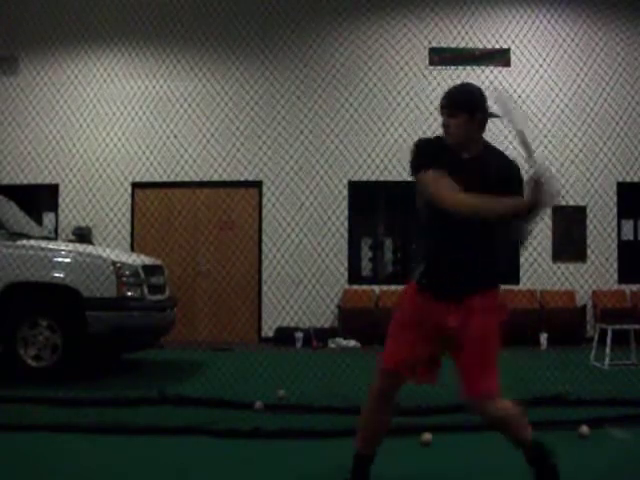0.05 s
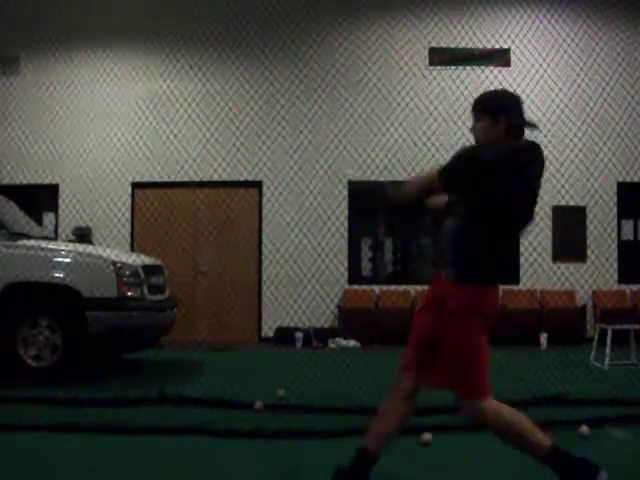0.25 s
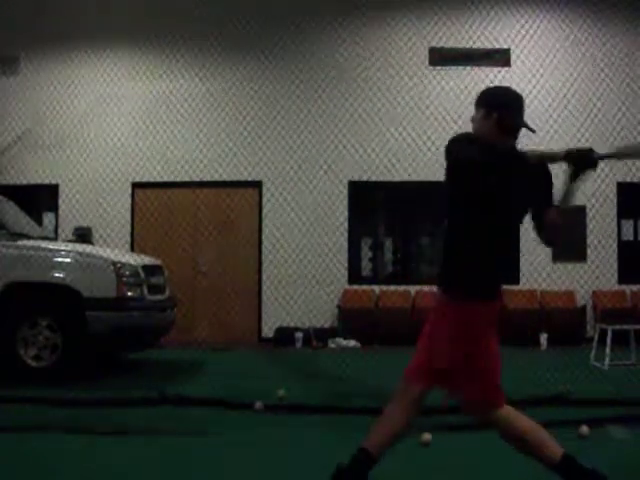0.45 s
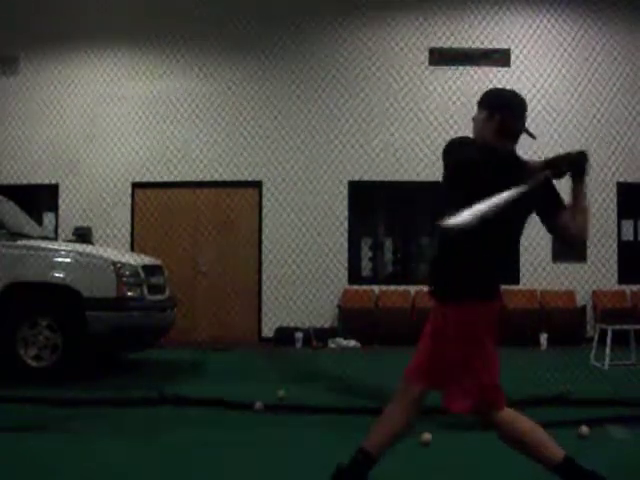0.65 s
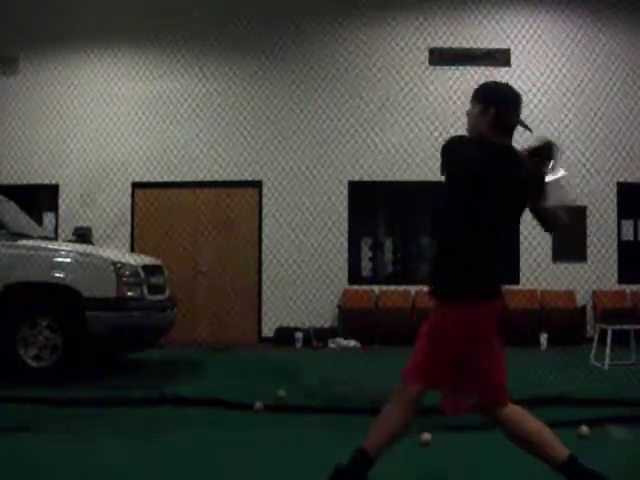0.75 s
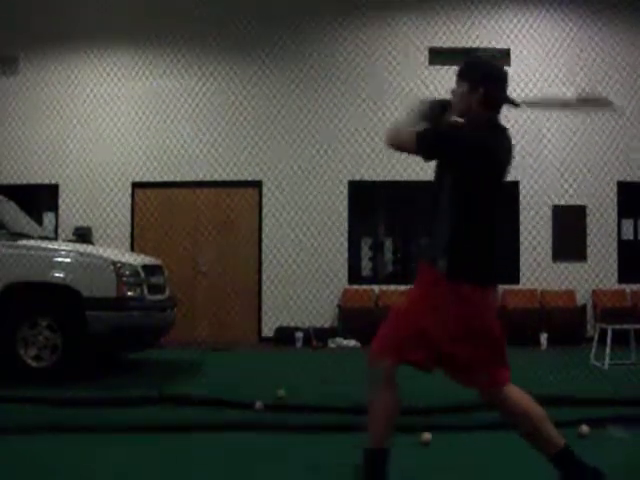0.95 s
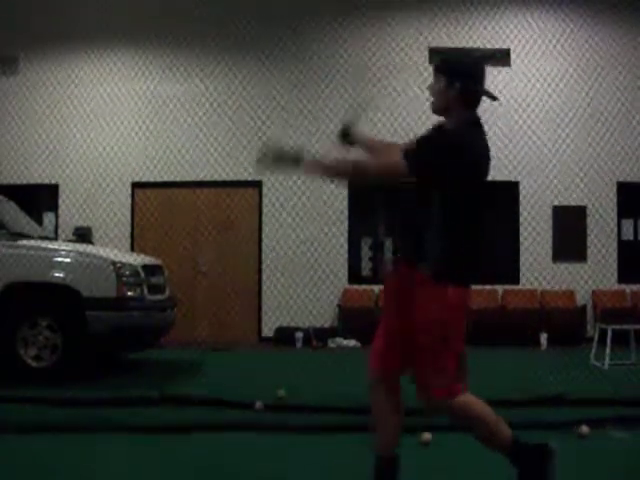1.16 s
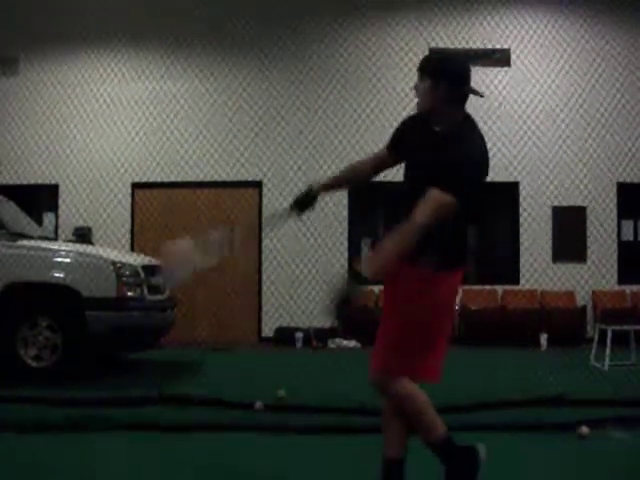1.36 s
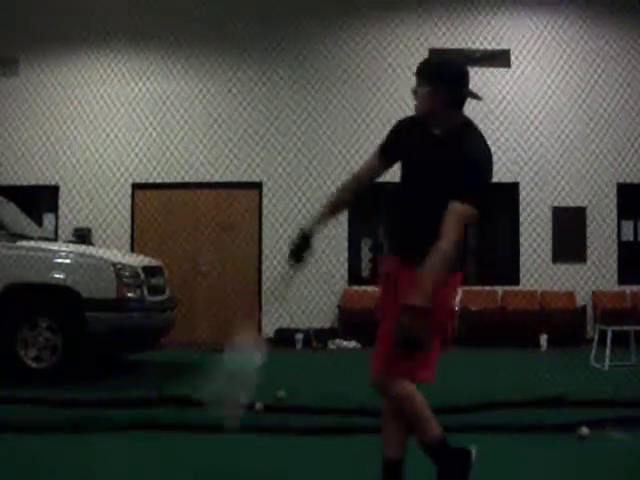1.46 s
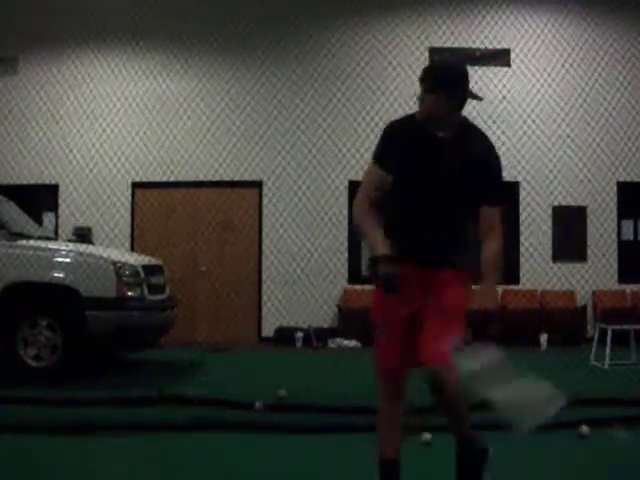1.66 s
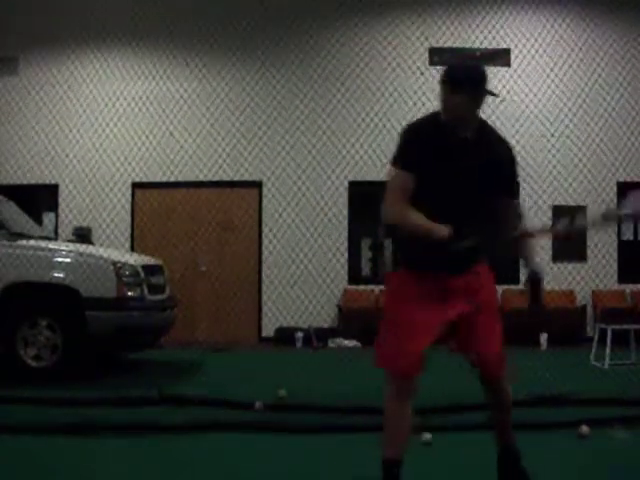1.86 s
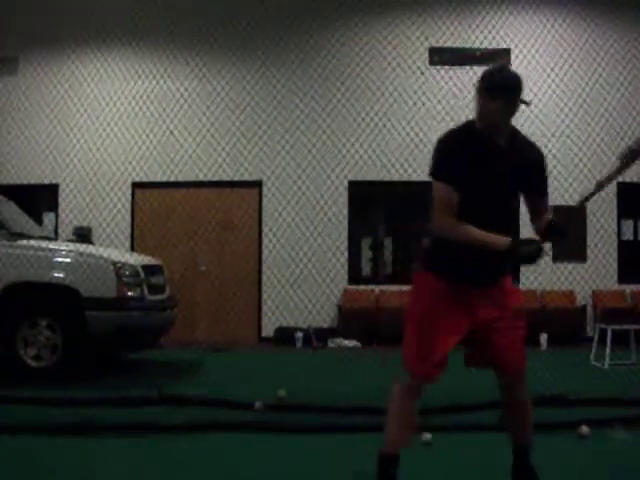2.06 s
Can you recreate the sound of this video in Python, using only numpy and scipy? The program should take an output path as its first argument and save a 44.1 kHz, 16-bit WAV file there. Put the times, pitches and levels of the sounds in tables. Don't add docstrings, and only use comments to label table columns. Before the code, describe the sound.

Loud bat-on-ball crack and bright metallic ring, echoing in a large hard room and distorted by a cheap camera microphone whose level ducks and recovers; then a low thud, smaller bumps and faint shoe scuffs.

```python
import sys
import numpy as np
from scipy import signal
from scipy.fft import rfft, irfft
from scipy.io import wavfile
from scipy.ndimage import uniform_filter1d

SR = 44100
rng = np.random.default_rng(int(sys.argv[2]) if len(sys.argv) > 2 else 0)


def wav_record(signal):
    frames = np.transpose(np.atleast_2d(signal))
    bounded = np.clip(frames, -1, 1)
    quanta = np.round(bounded * 32767).astype(np.int16)
    wavfile.write(sys.argv[1], SR, quanta)


def field_ratio(decibels):
    return 10 ** (np.asarray(decibels, dtype=float) / 20)


N = 92610
HIT_S = 0.2112


def evened(x):
    return x / np.sqrt(np.mean(x ** 2) + 1e-20)


def read(points, hz):
    f, value = np.transpose(points)
    return np.interp(np.log(hz + 1), np.log(f + 1), value)


def add(mix, start_s, sound):
    part = mix[round(start_s * SR):][:len(sound)]
    part += sound[:len(part)]


def colour(x, points):
    return irfft(rfft(x) * field_ratio(read(points, np.fft.rfftfreq(len(x), 1 / SR))), len(x))


def band(x, low_hz, high_hz):
    return signal.sosfilt(signal.butter(2, [low_hz, high_hz], "bandpass", fs=SR, output="sos"), x)


def mode(hz, db, t60, size=22050):
    t = np.arange(size) / SR
    return field_ratio(db - 60 * t / t60) * np.sin(2 * np.pi * hz * t)


def blow():
    # pitch_hz [Hz], level_db [dB], fade_s [s per 60 dB]
    crack_modes = [(425.5, 10, 0.013), (729, -1.5, 0.016), (1034, 19.5, 0.0073), (1576, 11.5, 0.019),
                   (2535, 14.5, 0.0096), (5000, -1.5, 0.043)]
    t = np.arange(22050) / SR
    rise = np.minimum(t / 0.0005, 1)
    return -rise * sum(mode(*row) for row in crack_modes)


def barrel():
    # pitch_hz [Hz], level_db [dB], fade_s [s per 60 dB]
    barrel_modes = [(1873.6, 2.5, 1.1), (2408, -14.5, 0.45), (2514, -21, 0.45), (1280, -17, 0.3),
                    (1387, -11, 0.21), (640, -39.5, 0.3), (3758, -19.5, 2.4)]
    turn_away_s, turn_away_t60 = 0.045, 0.04
    t = np.arange(22050) / SR
    rise = np.minimum(t / 0.005, 1) ** 2
    turned = field_ratio(-60 * np.maximum(t - turn_away_s, 0) / turn_away_t60)
    return -rise * turned * sum(mode(*row) for row in barrel_modes)


def near_walls():
    level_db, t60 = -15.5, 0.42
    t = np.arange(22050) / SR
    scatter = evened(band(rng.standard_normal(len(t)), 1900, 4600))
    return np.minimum(t / 0.023, 1) * field_ratio(level_db - 60 * t / t60) * scatter


def hall():
    # pitch_hz [Hz], fade_s [s per 60 dB]
    hall_fade = [(300, 2.1), (600, 0.99), (1000, 4), (1500, 2.25), (2000, 2.024), (2700, 1.74), (3500, 2.2),
                 (5000, 1.1)]
    # pitch_hz [Hz], spread_hz [Hz], level_db [dB]
    ring_smear = [(1885.6, 18, -2), (1931.3, 6, -4.5), (1984.5, 8.5, -7.5), (2050, 23, -1),
                  (2105.7, 13.4, -3), (2363, 72, -22), (2618, 59, -24.5), (1884, 180, -15.5)]
    # pitch_hz [Hz], level_db [dB]
    crack_colour = [(300, -26), (600, -17.5), (900, -7.5), (1250, -19.5), (1600, -6.5), (2500, 6),
                    (3200, -8), (5500, -19.5)]
    ring_db, crack_db = 7.5, -13.5
    delay_s, rise_s = 0.05, 0.045
    hz, t, z = signal.stft(rng.standard_normal(N), SR, nperseg=256)
    fade = field_ratio(-60 * t / read(hall_fade, hz)[:, None])
    tail = signal.istft(z * fade, SR, nperseg=256)[1][:N]
    hz = np.fft.rfftfreq(N, 1 / SR)
    power = sum(field_ratio(2 * db) / wide * np.exp(-((hz - mid_hz) / wide) ** 2) for mid_hz, wide, db in ring_smear)
    ring = irfft(rfft(tail) * np.sqrt(power * SR / 8), N)
    heard = field_ratio(ring_db) * ring + field_ratio(crack_db) * colour(tail, crack_colour)
    return heard * np.clip((np.arange(N) / SR - delay_s) / rise_s, 0, 1)


def far_echoes():
    # start_s [s], pitch_hz [Hz], level_db [dB], length_s [s]
    wall_echoes = [
        (0.281, 2097, 6, 0.032),
        (0.409, 2050, 9.5, 0.073),
        (1.322, 2087, -19, 0.0503),
    ]
    out = np.zeros(N)
    for start_s, hz, db, length in wall_echoes:
        t = np.arange(0, length, 1 / SR)
        swell = np.sin(np.pi * t / length)
        add(out, start_s, field_ratio(db) * swell * np.sin(2 * np.pi * hz * t))
    return out


def bat():
    out = far_echoes()
    add(out, HIT_S, blow() + barrel())
    add(out, HIT_S, hall())
    add(out, HIT_S + 0.035, near_walls())
    return out


def thuds():
    # start_s [s], level_db [dB], pitch_hz [Hz], fade_s
    # [s per 60 dB]
    low_pushes = [(1.149, -24.5, 60, .1), (1.17, -23.5, 205.6, 0.013), (1.3041, -5.5, 250, 0.022),
                  (1.314, -14, 329, .02), (1.32, -21.5, 770, 0.034), (1.3246, -9, 290, 0.023),
                  (1.335, -19, 259, 0.013), (1.355, -24.5, 112.7, 0.025), (1.426, -22.5, 202.4, 0.035),
                  (1.49, -30, 209, 0.11), (1.833, -47, 72.8, 0.11), (1.913, -29.5, 95, 0.12),
                  (1.921, -29.5, 330, 0.033), (1.987, -22, 218, 0.031), (2.007, -25.5, 208, 0.051),
                  (2.068, -40, 900, 0.045), (2.069, -31, 1450, 0.011)]
    slap_db, slap_t60 = -18, 0.04
    rumble_db, rumble_t60 = -23.5, 0.9
    out, t = np.zeros(N), np.arange(22050) / SR
    for start_s, db, hz, t60 in low_pushes:
        u = 2 * np.pi * hz * t
        push = np.sin(u + 0.54 * (1 - np.exp(-u))) * field_ratio(-60 * t / t60)
        slap_noise = band(band(rng.standard_normal(len(t)), 530, 2100), 370, 1500)
        slap = field_ratio(slap_db - 60 * t / slap_t60) * evened(slap_noise)
        rumble_noise = evened(band(rng.standard_normal(len(t)), 100, 300))
        rumble = field_ratio(rumble_db - 60 * t / rumble_t60) * rumble_noise * np.minimum(t / 0.03, 1)
        rise = np.minimum(t / 0.0012, 1)
        add(out, start_s, field_ratio(db) * rise * (push + slap + rumble))
    return out


def scuffs():
    # start_s [s], length_s [s], hiss_db [dB], squeak_db [dB], squeak_hz [Hz]
    shoe_scuffs = [
        (1.584, 0.09, -98.5, -57.5, 3380),
        (1.706, 0.02, -73.5, -59, 3350),
        (1.993, 0.062, -53.5, -55.5, 3500),
        (2.03, .09, -56, -83.5, 3220),
    ]
    out = np.zeros(N)
    for start_s, length, hiss_db, squeak_db, hz in shoe_scuffs:
        t = np.arange(0, length, 1 / SR)
        noise = rng.standard_normal((2, 8820))
        grit = field_ratio(hiss_db) * evened(band(noise[0], 2100, 4800))[:len(t)]
        shake = 0.01352 * evened(uniform_filter1d(noise[1], 150))[:len(t)]
        pitch_hz = hz * (1 - 0.06 * t / length + shake)
        squeak = field_ratio(squeak_db) * np.sin(2 * np.pi * np.cumsum(pitch_hz) / SR)
        add(out, start_s, np.sin(np.pi * t / length) * (grit + squeak))
    return out


def swing():
    # centre_s [s], half_width_s [s], level_db [dB], low_hz [Hz], high_hz [Hz]
    whooshes = [
        (.1, 0.067, -41, 730, 2700),
        (.197, 0.017, -30, 180, 2600),
        (0.041, .12, -50.5, 1550, 1700),
        (0.12, 0.3, -48.5, 170, 550),
    ]
    t = np.arange(N) / SR
    out = np.zeros(N)
    for centre_s, half_s, db, low_hz, high_hz in whooshes:
        rush = evened(band(band(rng.standard_normal(N), low_hz, high_hz), low_hz, high_hz))
        out += field_ratio(db) * np.exp(-((t - centre_s) / half_s) ** 2) * rush
    return out * (t < HIT_S + 0.01)


def gust():
    peak_s, flutter_hz, level_db = 0.2052, 56.1, -13
    grow_s, die_s = 0.029, 0.006
    t = np.arange(N) / SR - peak_s
    flutter = np.cos(2 * np.pi * flutter_hz * t) + 0.46 * np.cos(2 * np.pi * 1.9 * flutter_hz * t)
    return -field_ratio(level_db) * np.exp(np.minimum(t / grow_s, -t / die_s)) * flutter


def air():
    # pitch_hz [Hz], level_db [dB]
    air_colour = [(15, -7.5), (30, 6), (140, -13), (400, -24), (700, -30.5), (1300, -36.5), (2500, -49),
                  (5600, -71.5)]
    # pitch_hz [Hz], level_db [dB]
    hum_tones = [(59, -42.5), (120, -39.5)]
    t = np.arange(N) / SR
    lumps = evened(uniform_filter1d(uniform_filter1d(rng.standard_normal((3, N)), 2500), 2500))
    out = field_ratio(-35 + 0.88 * lumps[2]) * evened(colour(rng.standard_normal(N), air_colour))
    for k, (hz, db) in enumerate(hum_tones):
        out += field_ratio(db + 1.9 * lumps[k]) * np.sin(2 * np.pi * hz * t)
    return out


def scene():
    return (bat() + thuds() + scuffs() + swing() + gust() + air())[None]


def top_cut(x):
    return signal.sosfilt(signal.butter(12, 15830, fs=SR, output="sos"), x)


def record(dry):
    # time_s [s], level_db [dB]
    camera_gain = [
        (0.2532, -2),
        (0.2516, -5.5),
        (0.272, -13),
        (.33, -25.5),
        (0.398, -25.5),
        (0.599, -19),
        (0.901, -9.5),
        (1.079, 0.5),
        (1.198, 3),
    ]
    # pitch_hz [Hz], level_db [dB]
    image_colour = [(5900, -48), (6500, -20.5), (9150, -33.5), (12900, -45.5), (15500, -47), (16000, -69)]
    ceiling, ceiling_under, playback_ceiling = 0.59, 0.69, 0.72
    grit_db, hiss_db, whine_db = -26, -52.5, -70
    t = np.arange(N) / SR
    noise = rng.standard_normal((2, N))
    x = dry[0] * field_ratio(np.interp(t, *np.transpose(camera_gain)))
    x = signal.oaconvolve(x, signal.firwin(101, 5300, fs=SR), "same")
    clipped = np.clip(x, -ceiling_under, ceiling)

    slope = abs(np.gradient(clipped)) * 4
    step = np.minimum(uniform_filter1d(slope, 600), uniform_filter1d(slope, 5000))
    grit = colour(noise[0], [(300, -9), (900, 21), (3000, 13.5), (5500, -2.5)]) / 2
    hiss = colour(noise[0][::-1], [(300, -5), (1500, -7), (5500, -1.5)]) / 2
    clipped = clipped + field_ratio(grit_db) * step * grit + field_ratio(hiss_db) * hiss

    held = clipped * 4.0 * (np.arange(N) % 4 == 0)
    base = signal.oaconvolve(held, signal.firwin(201, 5596, window=("kaiser", 9), fs=SR), "same")
    overload = uniform_filter1d(1.0 * (abs(x) > ceiling), 90)
    over = np.clip(overload * 10 - 1, 0, 1) * (t < camera_gain[1][0])
    images = colour(held - base, image_colour) * over
    whine = field_ratio(whine_db) * evened(band(noise[1], 5385, 5405) + 0.7 * band(noise[1], 5620, 5640))
    out = np.clip(base + images + whine, -playback_ceiling, playback_ceiling)
    return top_cut(out[None])


dry = scene()
out = record(dry)
wav_record(out)
```